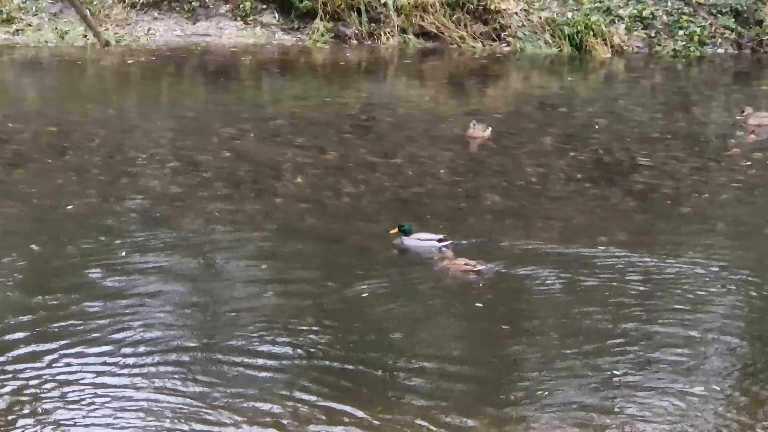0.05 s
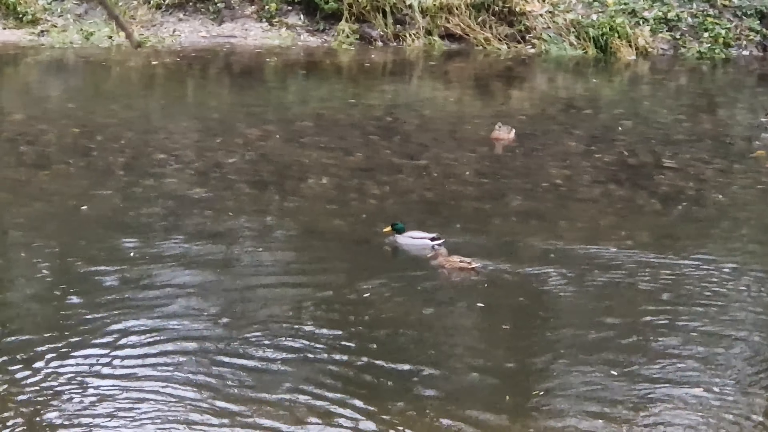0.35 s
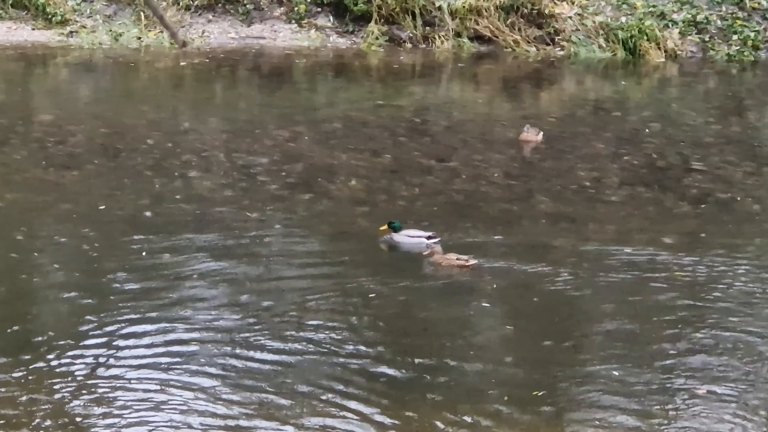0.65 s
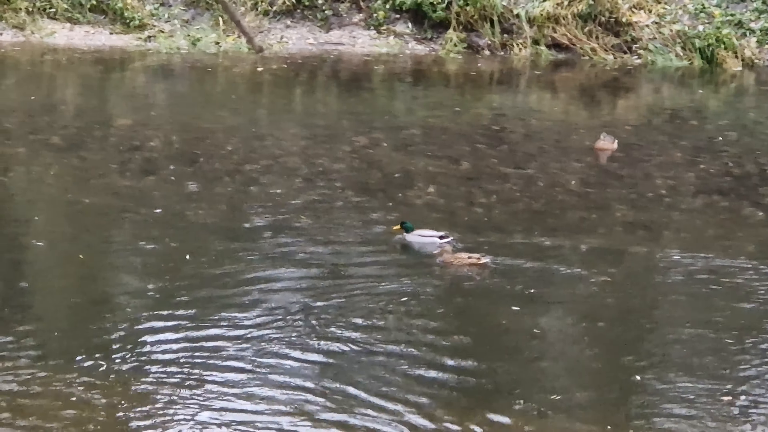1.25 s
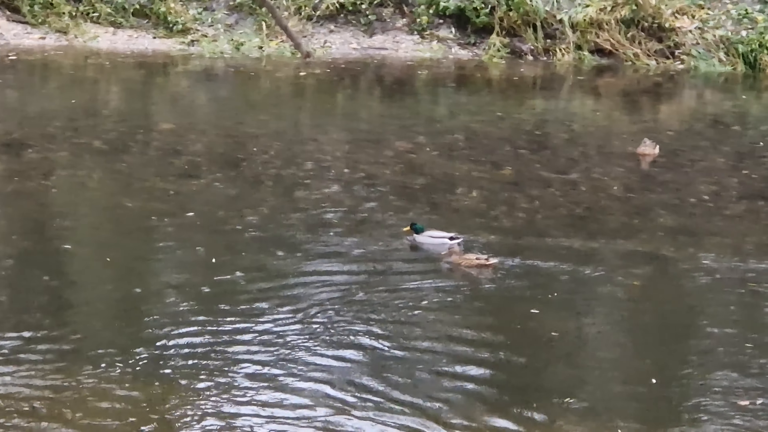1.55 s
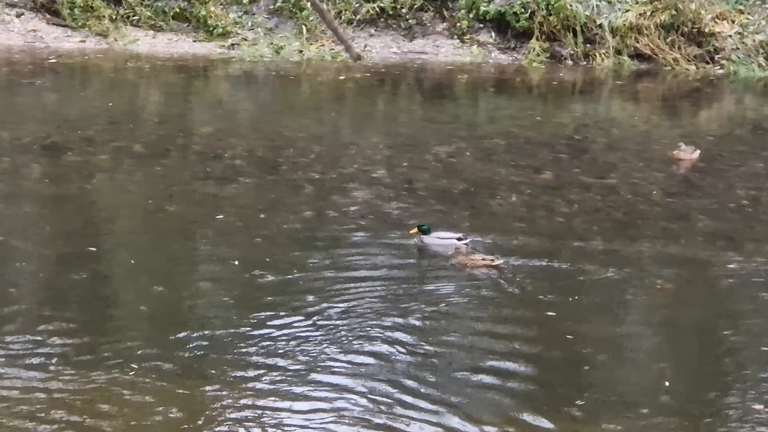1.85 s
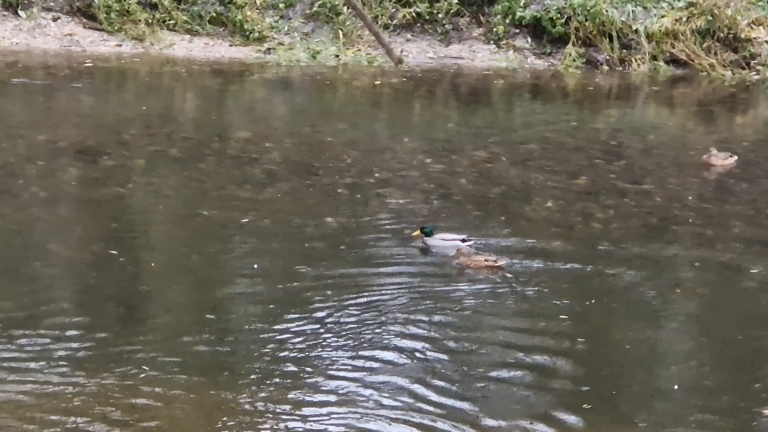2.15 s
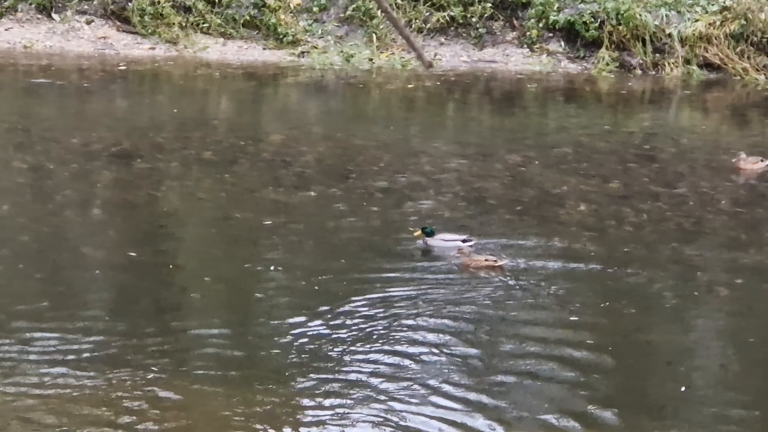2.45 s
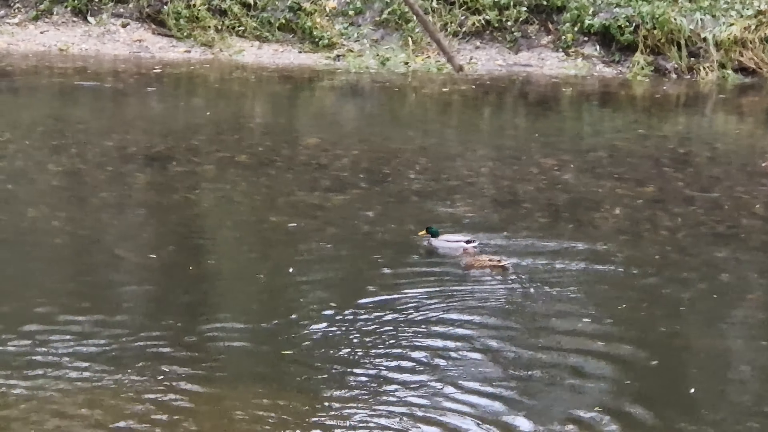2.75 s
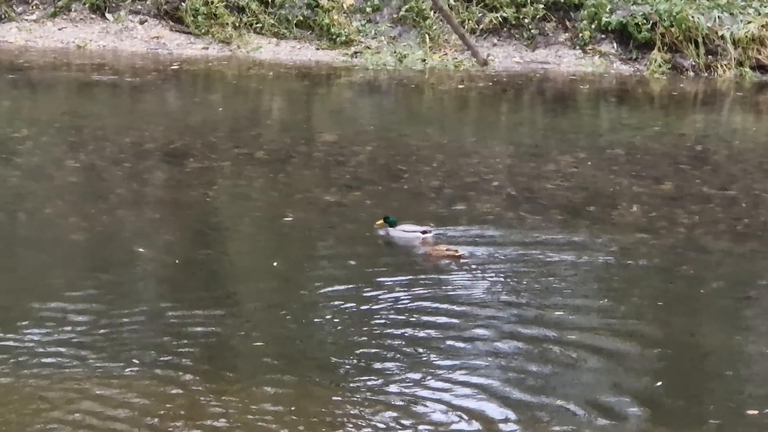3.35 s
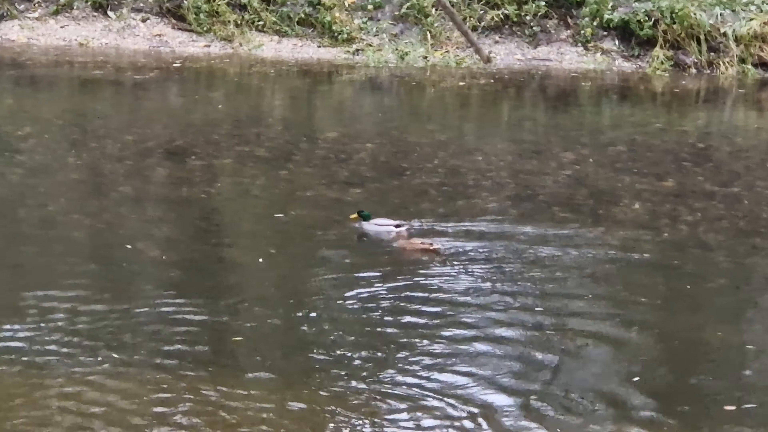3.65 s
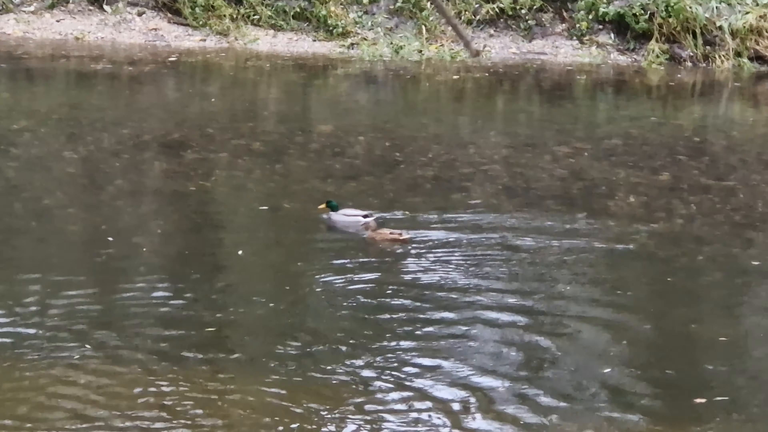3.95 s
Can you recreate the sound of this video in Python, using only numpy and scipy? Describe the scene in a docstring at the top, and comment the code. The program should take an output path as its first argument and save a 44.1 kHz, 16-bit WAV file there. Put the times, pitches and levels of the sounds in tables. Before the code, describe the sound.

A slow river washes and gurgles softly in light rain, with a far engine humming.

```python
"""A slow river in light rain, heard from the bank: a soft wash, gurgling bubbles and gentle sloshes.
Small drops ring in a fine patter, and nearer ones tick on the bank to the left.
A far engine hums over a low rumble and fades away; a distant bird gives one faint whistle.
Three small dull taps land close to the right microphone."""
import sys
import numpy as np
from scipy import signal
from scipy.fft import rfft, irfft
from scipy.io import wavfile

SR = 44100
rng = np.random.default_rng(int(sys.argv[2]) if len(sys.argv) > 2 else 0)


def unload_audio(sound):
    """Save the sound as a 16-bit wav file, at the path given as the first command line argument."""
    columns = np.transpose(np.atleast_2d(sound))
    # keep every value between -1 and 1, then stretch to whole-number steps
    steps = np.round(np.clip(columns, -1, 1) * 32767)
    wavfile.write(sys.argv[1], SR, steps.astype(np.int16))


N = 176400
TIME = np.arange(N) / SR
FREQS = np.maximum(np.arange(N // 2 + 1) * SR / N, 1)
CUTOFF_HZ = 15750


def from_db(db):
    """Decibels to gain."""
    return 10 ** (np.asarray(db) / 20)


def unit_rms(x):
    """Scale to rms 1."""
    return x / np.sqrt(np.mean(x ** 2) + 1e-20)


def over_time(rows):
    """Rows of seconds and value, interpolated at every sample."""
    return np.interp(TIME, *np.transpose(rows))


def over_frequency(rows):
    """Rows of Hz and value, interpolated along log frequency."""
    hz, value = np.transpose(rows)
    return np.interp(np.log(FREQS), np.log(hz), value)


def pan(db):
    """Gains at the two microphones for a left minus right difference in dB."""
    gains = from_db(np.array([[.5], [-.5]]) * db)
    return gains / np.sqrt(np.mean(gains ** 2, axis=0))


def drift(rate_hz):
    """A random wander of rms 1, mostly slower than rate_hz."""
    return unit_rms(irfft(rfft(rng.standard_normal(N)) / (1 + (FREQS / rate_hz) ** 2), N))


def resonate(x, hz, width_hz):
    """One resonance with gain 1 at its peak."""
    radius = np.exp(-np.pi * width_hz / SR)
    feedback = [1, -2 * radius * np.cos(2 * np.pi * hz / SR), radius ** 2]
    return signal.lfilter(np.array([1, 0, -1]) * (1 - radius ** 2) / 2, feedback, x + 1e-18)


# The open air leans to the left microphone. Each row: frequency in Hz, left minus right in dB.
AIR_BALANCE = [(150, 1.5), (380, 5.5), (520, 2), (950, 2), (1500, 6), (2400, 8.5), (3300, 7), (4200, 8),
               (5300, -2), (6500, 3), (8100, 2.5), (9200, 19.5), (12000, 3), (15000, 8)]
# How alike the two microphones hear the bass. Each row: frequency in Hz, correlation.
BASS_CORRELATION = [(30, .6), (60, .76), (130, .88)]
# The same above the bass. Each row: frequency in Hz, correlation.
UPPER_CORRELATION = [(300, .83), (500, .38), (700, 0.4), (1000, -0.011), (1500, -0.41), (2200, 0.32),
                     (3000, -0.2), (15000, 0.26)]

def outdoor_noise(spectrum, flicker_db, bands=26):
    """Diffuse stereo noise of rms 1 whose narrow bands each flicker a little."""
    mid, side = rfft(rng.standard_normal((2, N)))
    alike = over_frequency(BASS_CORRELATION + UPPER_CORRELATION)
    field = np.sqrt(1 + alike) * mid + np.sqrt(1 - alike) * side * [[1], [-1]]
    field *= from_db(over_frequency(spectrum)) * pan(over_frequency(AIR_BALANCE))
    band = np.digitize(FREQS, np.geomspace(20, CUTOFF_HZ, bands))
    return unit_rms(sum(irfft(field * (band == k), N) * from_db(flicker_db * drift(rate_hz=22))
                        for k in range(bands)))


# The water as it reaches the bank. Each row: frequency in Hz, relative level in dB.
WASH_SPECTRUM = [(100, -64.5), (170, -67.5), (300, -72.5), (390, -73.5), (470, -78.5), (600, -78),
                 (1050, -79.5), (1250, -80), (1480, -77), (1780, -81.5), (2150, -78.5), (3100, -90.5),
                 (3700, -90), (4400, -87.5), (5100, -94), (6000, -100.5), (6800, -101.5), (7600, -99),
                 (8400, -104), (9000, -116), (10000, -115), (12000, -112.5), (16000, -112)]
# Its slow swell. Each row: time in seconds, gain in dB.
WASH_SWELL = [(0, 3), (.8, 2.7), (1.2, 1.8), (2, 1.5), (2.8, 2.5), (3.4, 2.5), (4, 2.6)]

def river(base_db=-53.5):
    """Moving water and far rain blend into one smooth wash."""
    return from_db(base_db + over_time(WASH_SWELL)) * outdoor_noise(WASH_SPECTRUM, flicker_db=1.5)


# The engine's hum, far off and a little left. Each row: time in seconds, level in dB.
HUM_LEVEL = [(0, -37), (.6, -38.5), (1.45, -36), (1.7, -41), (2.1, -37), (2.35, -41.5), (2.7, -47.5),
             (3.15, -44), (3.45, -52.5), (4, -59.5)]
# The rumble under it. Each row: time in seconds, level in dB.
RUMBLE_LOUDNESS = [(0, -39), (.35, -37.5), (.55, -47), (.8, -40), (1.05, -40), (1.52, -39), (1.7, -37),
                   (2.0, -45.5), (2.3, -38.5), (2.5, -44), (2.63, -43.5), (2.85, -49), (3.15, -42),
                   (3.45, -45.5), (3.7, -43.5), (4, -49.5)]
# The rumble's deep colour. Each row: frequency in Hz, relative level in dB.
RUMBLE_SPECTRUM = [(15, -22), (27, -7.5), (42, -5), (50, -1), (58, 2), (66, -2.5), (74, -6.5), (100, -6.5),
                   (120, -12), (140, -22), (220, -38), (1000, -90)]

def engine(hum_hz=105.6, waver_db=1.0):
    """A far engine holds one low note over a rumble, both fading unevenly."""
    tone = np.sqrt(2) * np.sin(2 * np.pi * hum_hz * TIME)
    hum = tone * from_db(over_time(HUM_LEVEL) + waver_db * drift(rate_hz=23))
    rumble = from_db(over_time(RUMBLE_LOUDNESS)) * outdoor_noise(RUMBLE_SPECTRUM, flicker_db=3)
    return hum * pan(db=2) + rumble


# Bubbles out in the current, large to small. Each row: bubbles per second, overall level in dB,
# lowest and highest pitch in Hz, cycles to fall 60 dB, left minus right in dB.
BUBBLE_SIZES = [(32.1, -61, 190, 400, 38.5, -0.5), (74, -69.5, 720, 2800, 74, 4),
                (58, -80, 2600, 8000, 166.5, 6)]

def bubbles(spread_db=2.5, tilt=.73, max_lag_s=.00045, size=12000):
    """The current gurgles: each bubble rings a faint dying note, the lower ones louder."""
    total, age = 0, np.arange(size) / SR
    for per_s, db, low_hz, high_hz, cycles, pan_db in BUBBLE_SIZES:
        swarm = np.zeros((2, N + size))
        for when, pitch, chance, bearing in rng.random((int(per_s * N / SR), 4)):
            hz, start = low_hz * (high_hz / low_hz) ** pitch, int(when * N)
            gain = from_db(spread_db * min(-np.log(chance), 2)) / hz ** tilt
            envelope = from_db(-60 * age * hz / cycles) * (1 - np.exp(-age * hz / 2))
            lag = np.array([[0], [max_lag_s * (2 * bearing - 1)]])   # between the microphones
            swarm[:, start:start + size] += gain * envelope * np.sin(2 * np.pi * hz * (age + lag))
        total = total + from_db(db) * pan(pan_db) * unit_rms(swarm[:, :N])
    return total


# The microphones' colouring of the drops. Each row: frequency in Hz, gain in dB.
MIC_COLOUR = [(600, -24.5), (1500, 3), (2500, 0.5), (4400, -0.5), (6000, -9.5), (8200, -5.5), (9000, -20),
              (12500, -23.5), (16000, -30.5)]

def mic_colour(drops):
    """The microphones colour the drops: strong mids, little bass, a steep dip near 9 kHz."""
    return irfft(rfft(drops) * from_db(over_frequency(MIC_COLOUR)), N)


def patter(per_s=220, level_db=-75.5, spread_db=1, ring_cycles=9.1, pitches=16):
    """Many small drops of random size land to the left, each ringing for a few cycles."""
    out = np.zeros((2, N))
    for hz in np.geomspace(1400, 11000, pitches):
        sizes = from_db(spread_db * np.minimum(rng.exponential(1, N), 4))
        hits = rng.random(N) < per_s / pitches / SR
        clicks = hits * sizes * rng.standard_normal((2, N))
        out += resonate(clicks, hz, 2 * hz / ring_cycles) / np.sqrt(hz)
    return from_db(level_db) * pan(db=8) * unit_rms(mic_colour(out))


# Sloshes in the current, equally loud at both microphones.
# Each row: middle in seconds, level in dB, pitch in Hz, half-length in seconds.
CURRENT_SLOSHES = [(0.193, -58, 850, 0.04), (1.926, -62, 930, .06), (2.23, -59, 750, .025),
                   (2.332, -58.5, 830, 0.054)]

def sloshes(width_hz=200):
    """Each slosh is a short, soft cloud of bubbles around one pitch."""
    out = np.zeros((2, N))
    for middle_s, db, hz, half_s in CURRENT_SLOSHES:
        cloud = resonate(resonate(rng.standard_normal((2, N)), hz, width_hz), hz, 2 * width_hz)
        envelope = np.exp(-2 * ((TIME - middle_s) / half_s) ** 2)
        out += from_db(db) * envelope * unit_rms(cloud)
    return out


# Drops on the bank, near the left microphone. Each row: start in seconds, peak in dB before
# colouring, pitch in Hz, left minus right in dB, seconds for the ring to fall 60 dB.
BANK_DROPS = [(.340, -40, 1590, 1, .008), (.403, -43, 4200, 4, .015), (1.160, -53.5, 3000, 9, .006),
              (1.288, -47, 7200, 9, .015), (1.422, -44, 3700, 7, .03), (1.4293, -37, 3730, 7, 0.015),
              (1.441, -44.5, 4200, 2, .04), (1.6143, -42, 1910, 14, .004), (1.63, -42.5, 2840, 11, .012),
              (1.7955, -45, 4200, 7, 0.011), (1.938, -47, 3560, 9, .02), (2.005, -48.5, 3400, 14, .02),
              (2.361, -43.5, 5970, 4, .01), (2.491, -47, 3400, 6, 0.017), (2.889, -41, 2100, 6, 0.046),
              (2.908, -42.5, 2860, 6, .025), (3.245, -46.5, 7300, 9, .015), (3.283, -46.5, 4750, 9, 0.013),
              (3.4653, -38.5, 3030, 8, 0.0085), (3.598, -41.5, 2420, 11, .008),
              (3.607, -41.5, 4330, 6, 0.0045), (3.6254, -37, 4500, 10, .006), (3.816, -47, 9500, 10, .012),
              (3.831, -50, 8400, -1, .015), (3.969, -45.5, 2800, 10, .01)]

def near_drops(splash_db=-2, splash_t60=.008, spray_db=-18, spray_t60=.09, size=6000):
    """Each near drop is a short bright splash that rings the spot it hits, with a faint tail of spray."""
    out, age = np.zeros((2, N + size)), np.arange(size) / SR
    for start_s, db, hz, pan_db, ring_t60 in BANK_DROPS:
        noise = rng.standard_normal((2, size))
        spray = from_db(spray_db - 60 * age / spray_t60)
        impact = noise * (from_db(-60 * age / ring_t60) + spray)
        width_hz = .34 * hz
        ring = resonate(resonate(impact, hz, width_hz), hz, 2 * width_hz)
        splash = noise * (from_db(-60 * age / splash_t60) + spray)
        drop = unit_rms(ring) + from_db(splash_db) * unit_rms(splash)
        drop /= np.abs(drop).max(axis=1, keepdims=True)
        start = int(start_s * SR)
        out[:, start:start + size] += from_db(db) * pan(pan_db) * drop
    return mic_colour(out[:, :N])


# Dull taps close to the right microphone.
# Each row: start in seconds, peak at that microphone in dB, low and high band edge in Hz.
CLOSE_TAPS = [(0.4107, -30, 560, 1250), (1.6530, -30, 540, 1180), (3.8356, -30.5, 690, 1270)]

def taps(left_db=-19, size=2000):
    """Heavily damped knocks of about a cycle and a half, faint on the left."""
    out = np.zeros(N + size)
    for start_s, db, low_hz, high_hz in CLOSE_TAPS:
        band = signal.butter(2, [low_hz, high_hz], "band", fs=SR, output="sos")
        knock = signal.sosfilt(band, signal.unit_impulse(size))
        start = int(start_s * SR)
        out[start:start + size] += from_db(db) * knock / np.abs(knock).max()
    return from_db([[left_db], [0]]) * out[:N]


def bird(hz=1550, width_hz=59, level_db=-59.5, start_s=.61, rise_s=.068, release_s=.766, fall_s=.025):
    """One level whistle, blurred by distance into a narrow, fluttering band."""
    band = 1 / (1 + ((FREQS - hz) / width_hz) ** 4)
    whistle = unit_rms(irfft(rfft(rng.standard_normal((2, N))) * band, N))
    rise = np.clip((TIME - start_s) / rise_s, 0, 1)
    fall = np.clip(1 - (TIME - release_s) / fall_s, 0, 1)
    return from_db(level_db) * pan(db=2) * rise * fall * whistle


def scene():
    """Everything that reaches the pair of microphones on the bank."""
    return river() + engine() + bubbles() + patter() + sloshes() + near_drops() + taps() + bird()


def record(dry):
    """The highest treble is cut steeply."""
    lowpass = signal.ellip(10, .05, 60, CUTOFF_HZ, fs=SR, output="sos")
    return signal.sosfiltfilt(lowpass, dry, padlen=500)


dry = scene()
out = record(dry)
unload_audio(out)
```